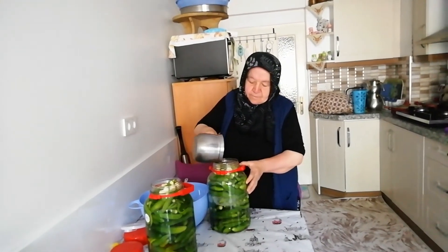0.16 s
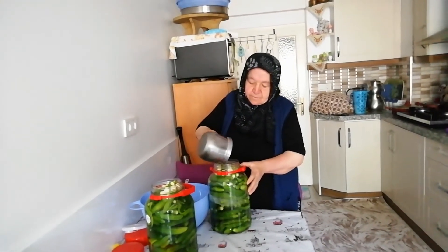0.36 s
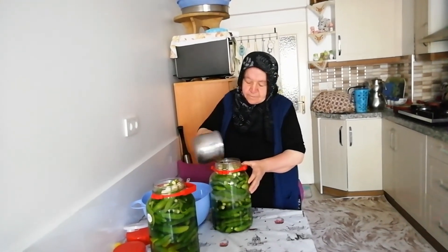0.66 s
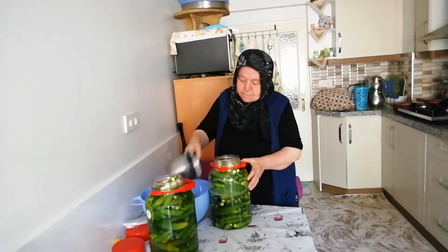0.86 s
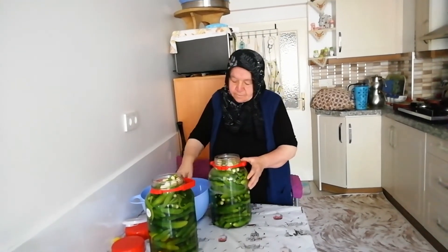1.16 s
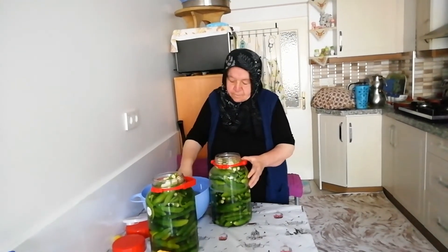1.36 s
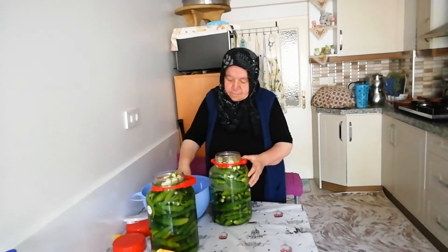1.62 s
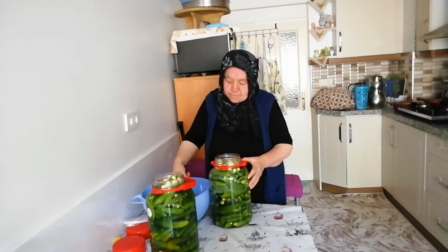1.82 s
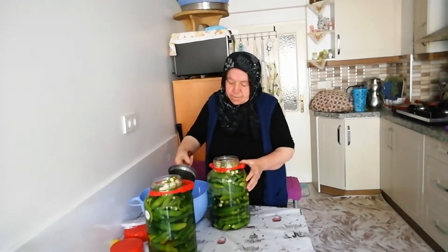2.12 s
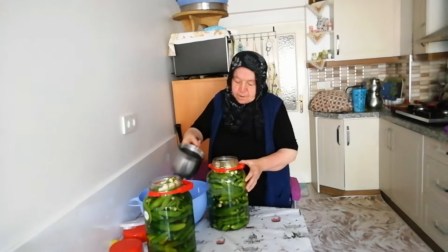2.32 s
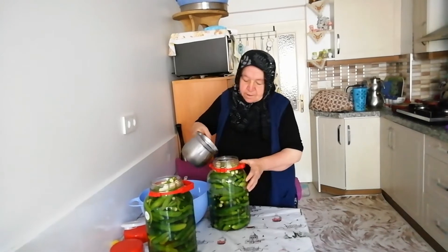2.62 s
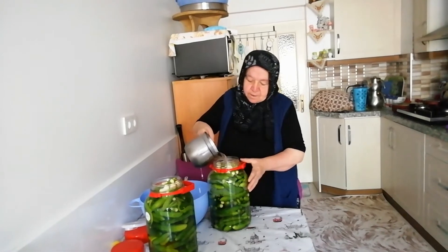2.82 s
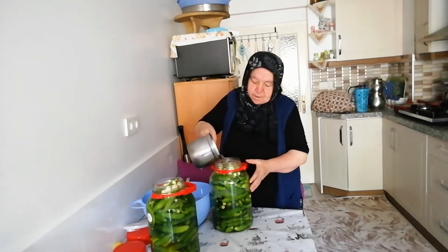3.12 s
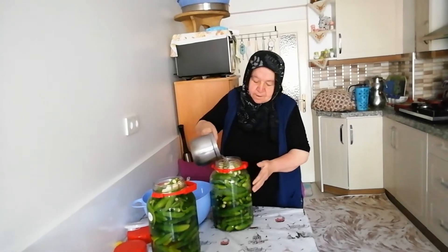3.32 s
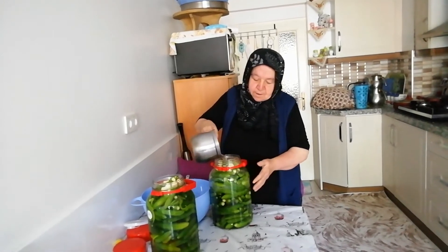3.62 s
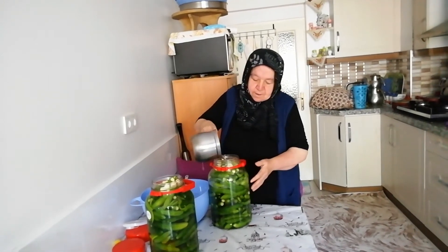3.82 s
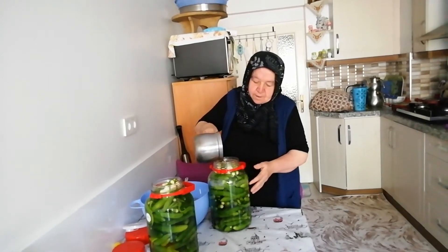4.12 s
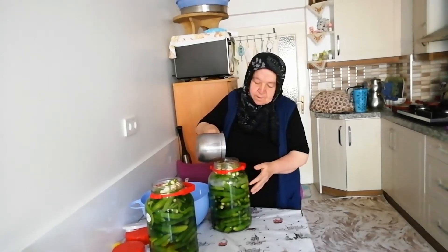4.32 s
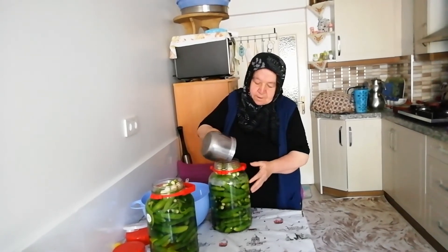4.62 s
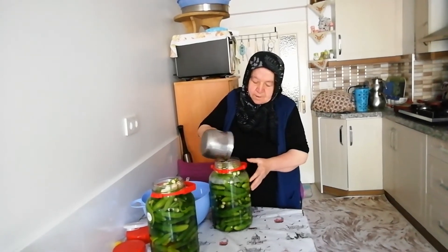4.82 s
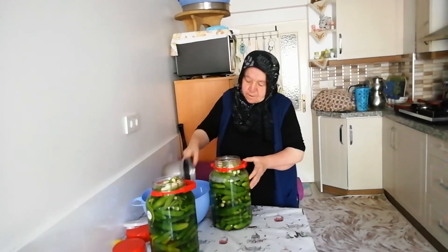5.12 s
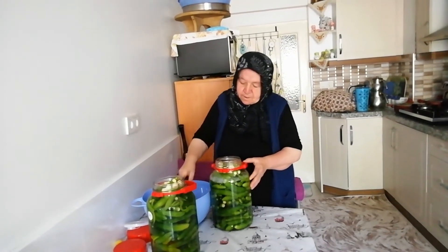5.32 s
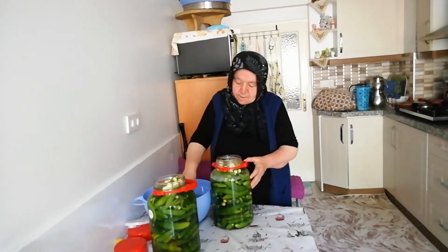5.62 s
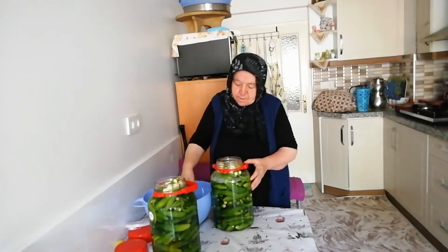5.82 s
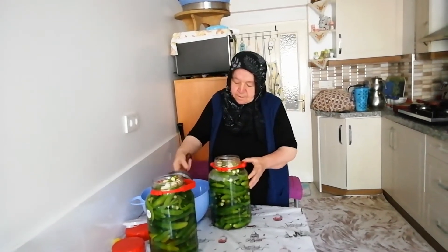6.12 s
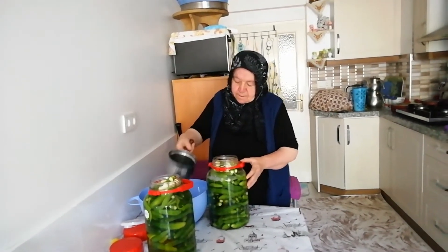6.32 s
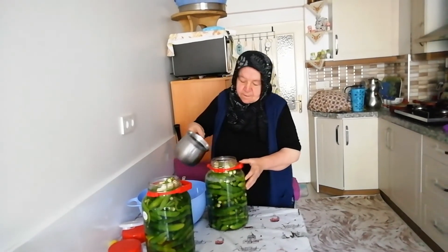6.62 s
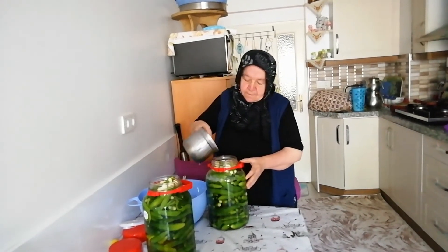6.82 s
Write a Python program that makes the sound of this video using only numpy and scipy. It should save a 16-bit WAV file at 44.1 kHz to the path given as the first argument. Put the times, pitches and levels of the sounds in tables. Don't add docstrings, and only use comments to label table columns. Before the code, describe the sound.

A steel cup scoops brine from a plastic basin, knocks on a glass jar's rim, pours with rising glugs, then scoops again.

```python
import sys
import numpy as np
from scipy import signal
from scipy.fft import rfft, irfft, next_fast_len
from scipy.io import wavfile

SR = 44100
rng = np.random.default_rng(int(sys.argv[2]) if len(sys.argv) > 2 else 0)


def gain_from_db(level_db):
    decades = np.asarray(level_db, float) / 20
    return 10 ** decades


def int16_out(signal):
    q = np.round(np.clip(np.atleast_2d(signal).T, -1, 1) * 32767)
    wavfile.write(sys.argv[1], SR, q.astype(np.int16))


N = 306997

# (frequency [Hz], level per Hz [dB])
AIR_COLOUR = [(8.8, -3.5), (15, 0.5), (84, -2), (125, -9.5), (169, -13.5), (269, -9), (455, -16),
              (575, -26), (726, -18), (1790, -18.5), (2270, -26), (2700, -22), (4180, -24.5), (11600, -31),
              (14700, -27), (16000, -32)]
# (frequency [Hz], likeness [-1..1])
AIR_LIKENESS = [(60, 0.99), (180, 0.92), (550, -0.33), (1650, 0.17), (4970, 0.021), (15000, -0.17)]
# (frequency [Hz], difference [dB])
AIR_TILT = [(60, -15), (150, 4.5), (380, -3), (950, -5), (2380, 1.5), (5980, -6.5), (15000, 3.5)]
# (frequency [Hz], width [Hz], level [dB])
MOTOR_LINES = [(282.6, 13, -83), (568, 47, -79.5), (1270, 47, -88.5), (1787, 9.3, -89.5), (2060, 13, -90.5)]
# (time [s], level [dB], width [s])
HUM_SWELLS = [(.3, -64.5, 0.24), (1.45, -60, 0.14), (1.8, -60, 0.19), (2.12, -57, 0.027),
              (2.35, -54, 0.035), (3.2, -68.5, 0.13), (4.03, -54, 0.19), (5.72, -49, 0.052),
              (6.11, -64, 0.13), (6.38, -71, 0.045), (6.77, -62, 0.067)]
# (time [s], level [dB], width [s])
FLOOR_SHAKES = [(.02, -63, 0.065), (1.45, -66, 0.15), (1.9, -60, 0.21), (2.34, -60, 0.057),
                (3.1, -62, 0.37), (3.45, -65, 0.11), (4.03, -72, 0.089), (4.58, -60, 0.018),
                (5.65, -70, 0.3), (6.1, -62, 0.082), (6.38, -56, 0.13)]

# (time [s], level [dB])
TRICKLE_LEVELS = [
    [(0.0, -59.5), (0.1, -67), (0.338, -57), (0.53, -66.5), (0.69, -68), (0.9, -100)],
    [(3.1, -39), (3.152, -74), (3.296, -58.5), (3.492, -65.5), (3.982, -65.5), (4.076, -66), (4.324, -75.5),
     (4.7, -64)],
]
# (frequency [Hz], level per Hz [dB])
TRICKLE_COLOUR = [(200, 8), (600, -22), (1300, 2.5), (2500, -6), (4000, -13), (7000, -15.5), (14000, -22)]
# (time [s], level [dB])
SPRAY_LEVELS = [
    (2.76, -60),
    (2.8, -66),
    (2.88, -56),
    (2.92, -45.5),
    (2.99, -74),
    (3.05, -48),
    (3.15, -76),
    (3.3, -80),
]

# (time [s], level [dB], pitch [Hz])
HIGH_DRIPS = [(0.1416, -59, 4930), (0.241, -63, 5400), (0.3494, -63, 4840), (0.458, -63, 5670),
              (1.2594, -62, 4700), (1.296, -54, 5180), (1.297, -55.5, 5850), (3.4216, -60, 6750),
              (3.6586, -66.5, 6350), (3.7704, -61, 4300), (3.9799, -67, 6150), (4.0612, -71, 6300),
              (4.5482, -62.5, 6230), (4.533, -66, 5900), (5.316, -62, 14300), (5.4415, -67, 6300),
              (5.6344, -40, 4500), (6.5486, -67, 4380)]
# (time [s], level [dB], pitch [Hz])
BASIN_DRIPS = [(1.3635, -35.5, 2860), (1.551, -47, 3040), (1.7998, -40.5, 2880), (1.8894, -65, 2060),
               (1.9558, -49, 1010), (2.2127, -60, 2260), (2.5332, -57.5, 3400), (5.7477, -46, 3200),
               (5.8618, -51, 1280), (5.902, -58, 3430), (5.956, -60, 3180), (5.9612, -53, 1800),
               (6.13, -56.5, 2780), (6.5319, -53.5, 2880), (6.5347, -63.5, 1380), (6.5504, -56.5, 2170),
               (1.366, -40, 3700), (1.362, -40, 5950), (5.627, -27, 1036), (5.63, -31, 492),
               (5.658, -30.5, 435), (5.715, -35.5, 1240), (2.1, -48, 1600), (5.925, -60, 2870),
               (5.995, -54.5, 2940), (6.03, -60, 2500), (1.47, -34, 3260), (1.5, -51, 3280),
               (1.38, -41, 405), (5.64, -38, 780)]
# (time [s], level [dB], pitch [Hz])
JAR_DRIPS = [(3.1014, -54, 2900), (3.235, -60, 2900), (3.266, -63, 2860), (3.3343, -62, 2970),
             (3.3521, -55, 2900), (3.3777, -53, 2840), (3.4164, -59, 2850), (3.6591, -60, 2700),
             (3.712, -53, 1430), (3.7294, -55, 1620), (3.8494, -69, 2800), (3.9647, -57, 3250),
             (4.0753, -60, 2960), (4.2892, -59, 2640), (4.308, -63.5, 3200), (4.385, -63, 2530),
             (4.579, -61, 2820), (4.9988, -62, 2600), (5.3165, -55.5, 2750), (3.714, -58, 2000),
             (3.716, -58, 1270), (3.742, -60, 1560), (3.432, -66, 2950), (3.39, -59, 2900),
             (3.53, -63, 2600), (3.99, -63, 2920), (4.44, -67, 2800)]
# (time [s], level [dB], pitch [Hz])
RINGING_DRIPS = [(0.2813, -56.5, 4250), (0.3244, -67, 4140), (1.6626, -43, 4360), (5.953, -52, 3480),
                 (5.989, -58, 3560), (6.018, -53, 3900), (1.585, -46, 3130), (1.645, -44, 3170),
                 (1.583, -41, 945), (1.648, -37.5, 944), (1.845, -51, 5930), (1.85, -51, 7000),
                 (1.888, -56, 3600), (1.665, -50, 5270), (5.76, -56, 4050), (5.79, -59, 3000),
                 (6.05, -63, 4200), (6.15, -65, 2900)]
# (time [s], level [dB], pitch [Hz])
TICKS = [(1.1148, -44, 9300), (1.129, -42, 6000), (1.798, -44, 3400), (1.839, -40, 1140), (1.95, -54, 2640),
         (1.7, -59, 2560), (3.1, -65, 1200), (2.9, -61, 4800), (2.4, -75, 2500), (2.3, -63, 2000),
         (5.862, -53, 1770), (6.262, -54.5, 1290), (2.611, -65, 15500), (2.611, -70, 12000),
         (2.533, -62, 1700), (1.95, -60, 6000), (5.862, -59.5, 3800), (2.533, -67, 6000)]
# (time [s], level [dB], pitch [Hz])
THUMPS = [
    (1.47, -37, 320),
    (1.975, -41, 176),
    (2.085, -49.5, 150),
    (2.756, -46, 195.6),
    (3.09, -49, 288),
    (5.63, -41, 253),
    (6.27, -60, 332),
]
# (time [s], level [dB], pitch [Hz])
CLOSE_RINGS = [(.285, -63, 1060), (.326, -63, 3500), (.33, -66, 7100), (.34, -65, 4950), (1.372, -47, 3620),
               (1.39, -50, 2000), (1.462, -41, 2900), (1.466, -40, 2050), (1.525, -43, 930),
               (1.845, -45, 2100), (2.082, -60, 2950), (2.084, -51, 1800), (2.086, -54, 820),
               (2.341, -67, 3800), (4.657, -63, 3144), (6.1, -59, 880), (6.165, -58, 1750)]
# (time [s], level [dB], pitch [Hz])
CLOSE_DROPS = [
    (3.103, -58, 2900),
    (3.266, -61, 2980),
    (3.352, -58, 2600),
    (3.381, -61, 2800),
    (3.417, -60, 2600),
    (3.659, -61, 2550),
    (5.861, -54, 1900),
]
# (time [s], level [dB], pitch [Hz])
LIFT_RING = [
    (5.987, -5.5, 1750),
    (6.008, -10.5, 1810),
]

# (time [s], level [dB], upper modes relative [dB])
TAPS = [
    (.249, -58, -18),
    (.3243, -50, -12),
    (1.117, -59, -31),
    (4.6578, -51, -2),
]
# (frequency [Hz], level [dB], t60 [s])
EMPTY_CUP = [(1061, -1, .47), (2116, -8, .28), (3144, 0, .2), (3500, -11, .2), (3750, -11, .15),
             (4215, -9, .2), (4750, -12, .6), (5340, -8, .6), (5862, -7, .15), (6272, -12, .2),
             (6665, -12, .2)]
# (time [s], level [dB], upper modes relative [dB])
RIM_HITS = [
    (2.7545, -32, 0),
    (2.889, -41, 1),
    (2.998, -46, 2),
]
# (frequency [Hz], t60 [s], first knock [dB], second knock [dB], third
# knock [dB])
RIM_MODES = [(1841, .38, -9, -16, -16), (2024, .3, -25, -20, -20), (2330, .3, -15, -10, -14),
             (2439, .4, -12, -13, -17), (2790, .25, -14, -17, -17), (2960, .16, -9, -8, -10),
             (3221, .42, -9, -7, -9), (3362, .2, -6, -12, -2), (3464, .4, -6, -4, -14),
             (3866, .28, -7, -6, -14), (4144, .22, -4, -8, -8), (4311, .3, -6, -20, -18),
             (4514, .3, -18, -18, -18), (4622, .3, -18, -18, -11), (4787, .35, -16, -18, -18),
             (5008, .28, -22, -4, -12), (5235, .2, -12, -12, -16), (3774, .25, -7, -16, -16),
             (6035, .16, -16, -5, -14), (6350, .3, -17, -16, -16), (6600, .25, -18, -18, -8),
             (7235, .3, -18, -10, -17)]
# (time [s], level [dB], upper modes relative [dB])
FULL_BOUNCE = [
    (2.796, -47, -.5),
]
# (frequency [Hz], level [dB], t60 [s])
FULL_RING = [(2439, -14, .5), (3219, -3, .5), (3461, 1, .4), (4145, -5, .3), (4312, -5, .3), (4514, -7, .4),
             (4786, -7, .45), (5685, -12, .4)]
# (time [s], level [dB], upper modes relative [dB])
EMPTY_BOUNCE = [
    (4.688, -62, -.5),
]
# (frequency [Hz], level [dB], t60 [s])
EMPTY_RING = [(2482, -7, .24), (3413, -4, .4), (3666, -4, .38), (3957, -1, .2), (4215, -1, .2),
              (4720, -4, .6), (5346, 2, .7), (7262, -8, .26)]

# (time [s], body [dB], then relative to it thud [dB], clack [dB], splash [dB])
TOUCHES = [
    (0.32, -61, 6, 15.5, 10),
    (.351, -68, -21, 13, 11.5),
    (1.113, -56.5, -9, -49, 24),
    (1.122, -70, -8, 27.5, -30),
    (1.282, -61, -4.5, 5, -7),
    (4.654, -56, 4, 10.5, 6),
    (6.523, -61.5, -20, -0.5, -13),
]
# (frequency [Hz], width [Hz], level [dB])
WET_RIM = [(155, 28, 3), (376, 35, -4.5), (4200, 400, -10), (6400, 1300, -10.5)]
# (low [Hz], high [Hz])
TOUCH_BANDS = [(150, 500), (500, 2000), (2750, 5500), (5000, 15500)]
# (time [s], body [dB], thud relative [dB], brightness relative [dB], contact [ms])
FIRST_SCOOP = [(1.357, -32, -8, -6, 6.9), (1.45, -23, -6.5, -9, 6.7), (1.465, -28, -6, -5, 6),
               (1.529, -30.5, -3, -14.5, 5.5), (1.6, -43.5, -4, -19, 9), (1.628, -37.5, -4, -8, 20),
               (1.65, -36, 1, -5, 14), (1.754, -36, -22, -18, 4.9), (1.806, -44.5, -10, -2, 5.2),
               (1.836, -28.5, -13, -14.5, 6.5), (1.857, -51.5, 7.5, -33, 6.7),
               (1.946, -36, -12.5, -23.5, 5.8), (1.973, -58.5, 10.5, -32, 6.2),
               (2.08, -40.5, -7, -20.5, 4.3), (2.118, -69, 3, 0, 6), (2.234, -46.5, -2, -22.5, 6),
               (2.269, -43.5, -5, -41, 6), (2.294, -54, 4.5, -15.5, 7.4), (2.339, -57, -19, -7.5, 5.2)]
# (time [s], body [dB], thud relative [dB], brightness relative [dB], contact [ms])
SECOND_SCOOP = [(5.62, -26, -5, -6, 6.3), (5.649, -32.5, -1.5, -7.5, 6), (5.683, -31.5, -8.5, -1, 6.2),
                (5.778, -40.5, -9, -39, 9.4), (5.859, -45, -5, -22, 5.2), (5.905, -66, -49, 6.5, 24),
                (5.984, -47, -37, -9, 5.3), (6.04, -49, -17, -5.5, 9.6), (6.087, -44, -9, -38, 4.1),
                (6.15, -46.5, -5.5, -20, 9.9), (6.261, -52.5, 1, -20, 7.4), (6.299, -56.5, 0, -19, 4.8),
                (6.369, -65, -2, -12, 6)]
# (frequency [Hz], width [Hz], level [dB])
BASIN = [(170.7, 22.3, 8), (257, 25, 2), (414, 90, -5), (770, 9.3, -52), (936, 324, 1.5), (970, 36, -20),
         (1600, 650, -4.5), (2960, 320, -3), (3370, 210, -6), (4500, 68, -96)]
# (low [Hz], high [Hz])
SCOOP_BANDS = [(150, 500), (500, 2000), (2200, 5500), (5500, 15500)]
# (time [s], level [dB], the clack 5 dB below it, then relative to the level thud [dB],
# body [dB], splash [dB])
RIM_KNOCKS = [
    (2.7525, -35, -0.5, 0, 4.5),
    (2.795, -32, -10.5, -29, -13),
    (2.8892, -37, -6, -6.5, -1.5),
    (2.997, -34.5, -12, -9, -6),
    (3.0998, -38, -28, -35, -22),
    (3.199, -46.5, -23, -32, -20),
    (3.416, -63, 2.5, -32, 0),
    (5.315, -71, -4, -34, 2),
]
# (frequency [Hz], width [Hz], level [dB])
JAR = [(150, 68, 1.5), (276, 34, 5), (357, 37, 2), (406, 33, 7), (780, 420, 12), (3600, 2600, -14)]
# (low [Hz], high [Hz])
RIM_BANDS = [(140, 450), (620, 900), (1400, 4600), (5200, 14000)]

# (time [s], pitch [Hz], level [dB])
SING = [(2.756, 888, -41), (2.8, 909, -44), (2.848, 942, -41), (2.866, 977, -61), (2.902, 949, -41),
        (2.942, 996, -49.5), (2.96, 988, -32.5), (2.973, 1012, -47), (2.984, 1000, -35), (2.992, 1140, -46),
        (3.004, 1075, -36), (3.032, 1117, -40), (3.056, 1118, -37), (3.134, 1115, -45), (3.158, 1112, -40),
        (3.21, 1166, -49.5), (3.248, 1177, -53), (3.258, 1190, -79)]
# (time [s], pitch [Hz], level [dB])
SING_HIGH = [
    (2.756, 1580, -51),
    (2.888, 1697, -62),
    (2.896, 1686, -50),
    (2.99, 1672, -61),
    (3.006, 1784, -58),
    (3.07, 1760, -59),
    (3.2, 1806, -66),
    (3.25, 1760, -75),
]
# (time [s], pitch [Hz], level [dB])
SING_END = [(3.254, 1205, -63), (3.272, 1210, -49), (3.3, 1216, -53.5), (3.312, 1220, -63),
            (3.342, 1225, -68), (3.36, 1233, -53), (3.374, 1226, -65), (3.426, 1224, -57),
            (3.47, 1237, -66), (3.52, 1242, -75), (3.6, 1250, -70), (3.69, 1257, -75), (4.0, 1255, -79),
            (4.15, 1260, -82)]
# (time [s], pitch [Hz], level [dB])
SING_LIFT = [
    (5.96, 931, -62),
    (5.984, 888, -57),
    (5.992, 886, -54.5),
    (6.07, 869, -53),
    (6.12, 877, -77),
    (6.2, 840, -74),
]

# (frequency [Hz], t60 [s])
KITCHEN = [(120, 0.53), (330, 0.33), (870, 0.35), (2300, 0.35), (6000, 0.3), (14000, 0.17)]
# (frequency [Hz], likeness [-1..1])
TABLE_LIKENESS = [(100, 1), (250, 0.96), (370, 0.8), (520, 0.0089), (1000, 0.076), (4000, 0.0046)]
# (frequency [Hz], difference [dB])
TABLE_TILT = [(60, -5), (120, -4), (240, -5), (480, -1), (950, 1), (1890, -0.5), (3770, -1.5), (7520, -11),
              (15000, 18)]
# (frequency [Hz], half width [Hz], level [dB])
MIC_DIP = (8380, 1060, -6)


def evened(x):
    return x / np.sqrt(np.mean(x ** 2) + 1e-20)


def unit(x):
    return x / np.linalg.norm(x)


def read(points, hz):
    f, value = np.transpose(points)
    return np.interp(np.log(hz + 1), np.log(f + 1), value)


def track(rows, column):
    rows = np.array(rows)
    return np.interp(np.arange(N) / SR, rows[:, 0], rows[:, column], -140, -140)


def add(mix, s, sound):
    part = mix[round(s * SR):][:len(sound)]
    part += sound[:len(part)]


def resonate(x, hz, width):
    turn = np.exp(2j * np.pi * np.cumsum(hz * np.ones(len(x))) / SR)
    r = np.exp(-np.pi * width / SR)
    return 2 * (turn * signal.lfilter([1 - r], [1, -r], x / turn)).real


def ports(a, b, same, tilt):
    hz = np.fft.rfftfreq(len(a), 1 / SR)
    likeness = np.clip(read(same, hz), -1, 1)
    left = rfft(a)
    right = likeness * left + np.sqrt(1 - likeness ** 2) * rfft(b)
    lean = gain_from_db(read(tilt, hz) * (1 - likeness ** 2) / 2)
    return irfft([left * lean, right / lean], len(a))


def swells(rows):
    t = np.arange(N) / SR
    return sum(gain_from_db(db) * np.exp(-((t - s) / width) ** 2) for s, db, width in rows)


def air():
    size = next_fast_len(N)
    hz = np.fft.rfftfreq(size, 1 / SR)
    tone, motor, rumble, shake = rfft(rng.standard_normal((4, 2, size)))
    lines = sum(gain_from_db(db) / np.sqrt(w) / (1 + (2 * (hz - f) / w) ** 2) for f, w, db in MOTOR_LINES)
    pair = gain_from_db(-64.5) * evened(irfft(tone * gain_from_db(read(AIR_COLOUR, hz)), size))
    pair = pair + gain_from_db(49) * irfft(motor * lines, size)
    rumble = evened(irfft(rumble[0] / (1 + ((hz - 81) / 7.5) ** 2), size)[:N])
    rumble *= (gain_from_db(-68) + swells(HUM_SWELLS)) * gain_from_db(-2)
    shake = evened(irfft(shake[0] / (1 + ((hz - 44) / 35) ** 2), size)[:N])
    shake *= (gain_from_db(-71) + swells(FLOOR_SHAKES)) * gain_from_db(-3)
    return ports(*pair, AIR_LIKENESS, AIR_TILT)[:, :N] + rumble + shake


def trickle(per_s=500, gain_db=-32, cycles=3.9, spray_hz=4000):
    out, u = np.zeros(N), np.arange(512)
    for hz in np.geomspace(250, 14000, num=24):
        births = (rng.random(N) < per_s / 24 / SR).astype(float)
        bubble = unit(np.exp(-u * hz / SR / cycles) * np.sin(2 * np.pi * hz * u / SR))
        out += gain_from_db(read(TRICKLE_COLOUR, hz)) * np.sqrt(hz) * signal.oaconvolve(births, bubble)[:N]
    fine = signal.sosfilt(signal.butter(2, spray_hz, "high", fs=SR, output="sos"), out)
    flow = evened(out) * sum(gain_from_db(track(rows, column=1)) for rows in TRICKLE_LEVELS)
    spray = evened(fine) * gain_from_db(track(SPRAY_LEVELS, column=1))
    return gain_from_db(gain_db) * (flow + spray)


def drips(rows, cycles, gain_db=-8, glide=0.0023, swell=0.29):
    out, t = np.zeros((3, N)), np.arange(4096) / SR
    for k, (s, db, hz) in enumerate(rows):
        n = t * hz
        shape = np.exp(-n / cycles) * (1 - np.exp(-n / (cycles * swell)))
        ring = shape * np.sin(2 * np.pi * n * (1 + glide * n / 2))
        add(out[k % 3], s, gain_from_db(db + gain_db) * unit(ring))
    return out


def falling_drops():
    bubbles = drips(HIGH_DRIPS, 8) + drips(BASIN_DRIPS, 5) + drips(JAR_DRIPS, 3.5)
    return bubbles + drips(RINGING_DRIPS, 14) + drips(TICKS, 1.2) + drips(THUMPS, 3)


def close_rings():
    rings = drips(CLOSE_RINGS, 30, gain_db=25.5, glide=0.0001, swell=0.1)
    drops = drips(CLOSE_DROPS, 4, gain_db=23.5, swell=0.2)
    lift = drips(LIFT_RING, 36, glide=0.0001, swell=0.08)
    return (rings + drops + lift).sum(0)


def clinks(hits, modes):
    out, t = np.zeros((2, N)), np.arange(SR // 2) / SR
    hz, peak_db, t60 = np.transpose(modes)[:, :, None]
    attack = 1 - np.exp(-t / 0.0015)
    for s, db, upper_db in hits:
        scatter = rng.standard_normal((2, 2, len(modes), 1)) * np.minimum(hz / 6000, 1)
        for side, (spot, turn) in zip(out, scatter):
            level_db = peak_db + upper_db * (hz > hz[0]) + 2 * spot
            ring = gain_from_db(level_db - 60 * t / t60) * np.sin(2 * np.pi * hz * t + turn)
            add(side, s, gain_from_db(db) * ring.sum(0) * attack)
    return out


def cup_rings():
    out = clinks(TAPS, EMPTY_CUP)
    for k, hit in enumerate(RIM_HITS):
        modes = [(hz, db[k], t60) for hz, t60, *db in RIM_MODES]
        out = out + clinks([hit], modes)
    return out


def cup_bounces():
    return clinks(EMPTY_BOUNCE, EMPTY_RING) + clinks(FULL_BOUNCE, FULL_RING)


def knocks(rows, body, bands, rise=0.42):
    out, t = np.zeros((3, N)), np.arange(4096) / SR
    filters = [signal.butter(4, band, "band", fs=SR, output="sos") for band in bands]
    for k, (s, *band_db, contact_s) in enumerate(rows):
        grit = rng.standard_normal(4096) * gain_from_db(1.6 * rng.standard_normal(4096))
        grit *= np.exp(-t / contact_s) * (1 - np.exp(-t / contact_s / rise))
        ringing = np.zeros(4096)
        for hz, width, db in body:
            detune = 1 + min(hz / 15000, 0.08) * (2 * rng.random() - 1)
            ringing += gain_from_db(db) * resonate(grit, hz * detune, width)
        grit = grit + 4 * ringing
        blow = sum(gain_from_db(db) * unit(signal.sosfilt(f, grit)) for f, db in zip(filters, band_db))
        add(out[k % 3], s, blow)
    return out


def basin_blows():
    touches = [(s, db + thud, db, db + clack, db + splash, 0.008)
               for s, db, thud, clack, splash in TOUCHES]
    scoops = [(s, db + thud, db, db + bright, db + bright + 0.5, ms * 0.001)
              for s, db, thud, bright, ms in FIRST_SCOOP + SECOND_SCOOP]
    return knocks(touches, WET_RIM, TOUCH_BANDS) + knocks(scoops, BASIN, SCOOP_BANDS)


def rim_blows():
    rows = [(s, db + thud, db + body, db - 5, db + splash, 0.0028)
            for s, db, thud, body, splash in RIM_KNOCKS]
    return knocks(rows, JAR, RIM_BANDS)


def singing(rows, waver, width=14):
    hz = np.maximum(track(rows, column=1), 0)
    tone = np.sqrt(2) * np.sin(2 * np.pi * np.cumsum(hz) / SR)
    edge = evened(resonate(rng.standard_normal(N), hz, width))
    return gain_from_db(track(rows, column=2)) * (tone + waver * edge)


def cup_song():
    pour = singing(SING, waver=0.15) + singing(SING_HIGH, waver=0.8, width=40)
    return pour + singing(SING_END, waver=0.4, width=30) + singing(SING_LIFT, waver=0.7, width=60)


def kitchen(sources, build_s=0.0023, direct_db=17, bend=1.132, early=0.21, early_s=0.06):
    out, t = np.zeros((2, N)), np.arange(16384) / SR
    for source in sources:
        hz, frame_s, z = signal.stft(rng.standard_normal((2, 16384)), SR, nperseg=256)
        decay = gain_from_db(-60 * (frame_s / read(KITCHEN, hz)[:, None]) ** bend)
        tail = signal.istft(z * decay, SR, nperseg=256)[1][:, :16384]
        tail *= 1 - np.exp(-t / build_s)
        tail *= 1 + early * np.exp(-t / early_s)
        tail[:, 64] += gain_from_db(direct_db)
        pair = ports(*tail, TABLE_LIKENESS, TABLE_TILT)
        out += signal.oaconvolve(source[None], pair, axes=1)[:, 64:N + 64]
    return out


def scene():
    drops, cup, song = falling_drops(), cup_rings(), cup_song()
    spots = gain_from_db(-5.5) * basin_blows() + gain_from_db(-6) * rim_blows() + drops
    spots[0] += trickle()
    echoed = gain_from_db(-35) * cup[0] + gain_from_db(-48) * song
    direct = song + gain_from_db(25) * drops.sum(0) + close_rings()
    near = cup + gain_from_db([[1.6], [-1.6]]) * np.array([direct, np.roll(direct, shift=2)])
    return kitchen([*spots, echoed]) + near + air() + cup_bounces()


def top_cut(x):
    return signal.sosfilt(signal.butter(12, 16480, fs=SR, output="sos"), x)


def record(dry):
    hz, width, db = MIC_DIP
    corners = [0, hz - width, hz, hz + width, SR / 2]
    dip = signal.firwin2(127, corners, [1, 1, gain_from_db(db), 1, 1], fs=SR)
    edge = np.convolve(signal.firwin(255, 15400, fs=SR), dip)[None]
    return top_cut(signal.oaconvolve(dry, edge, "same"))


dry = scene()
out = record(dry)
int16_out(out)
```